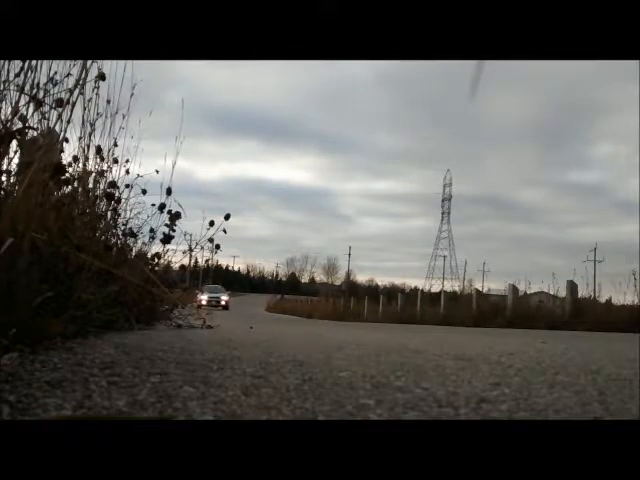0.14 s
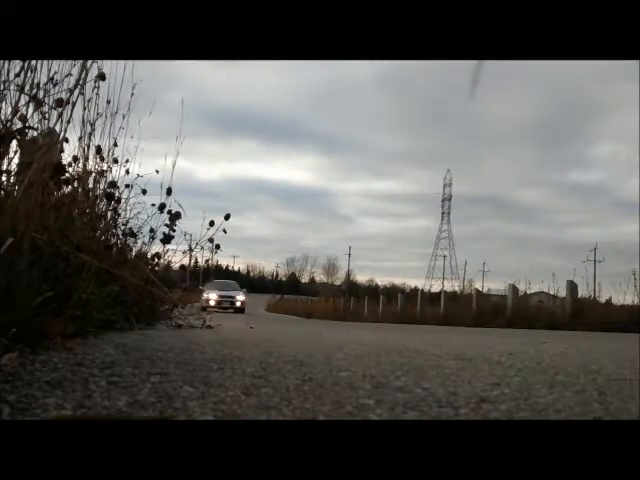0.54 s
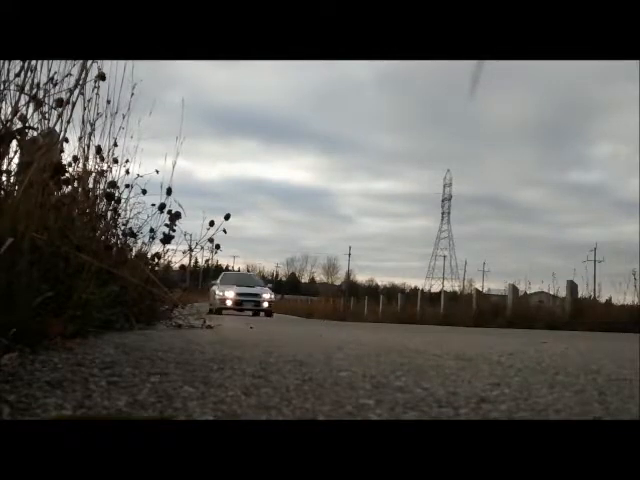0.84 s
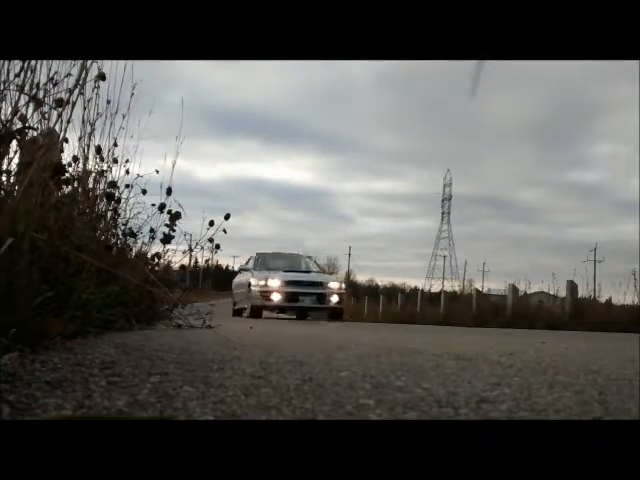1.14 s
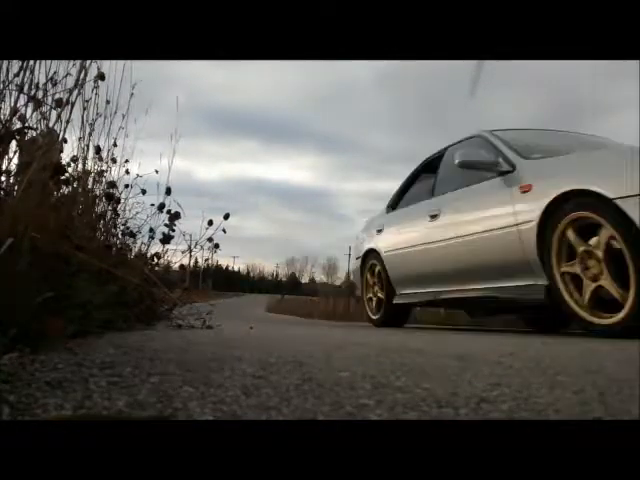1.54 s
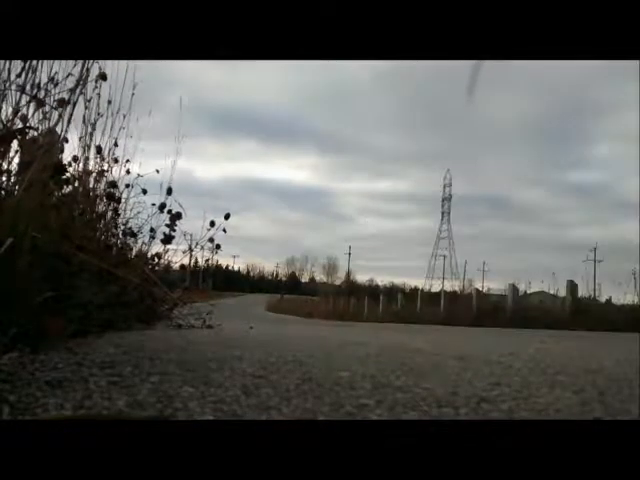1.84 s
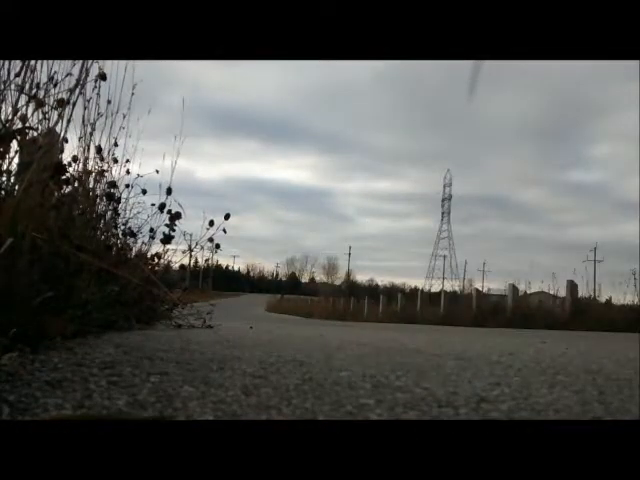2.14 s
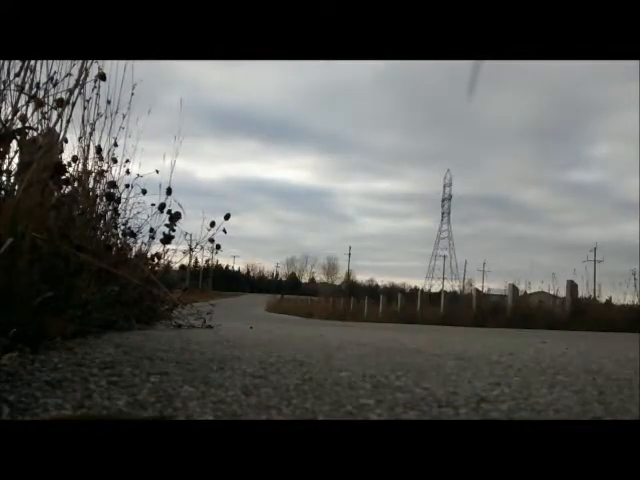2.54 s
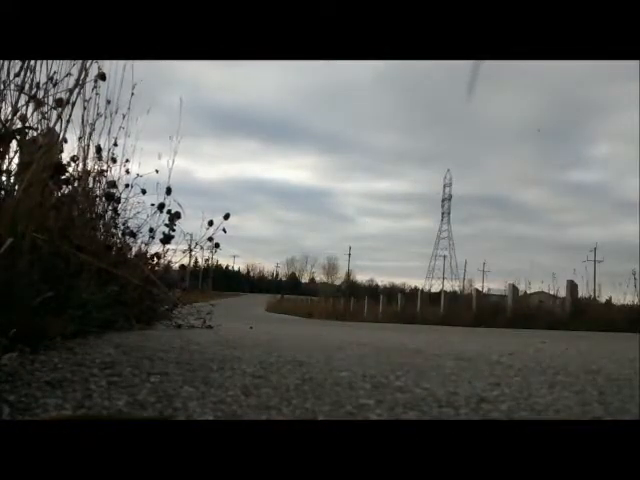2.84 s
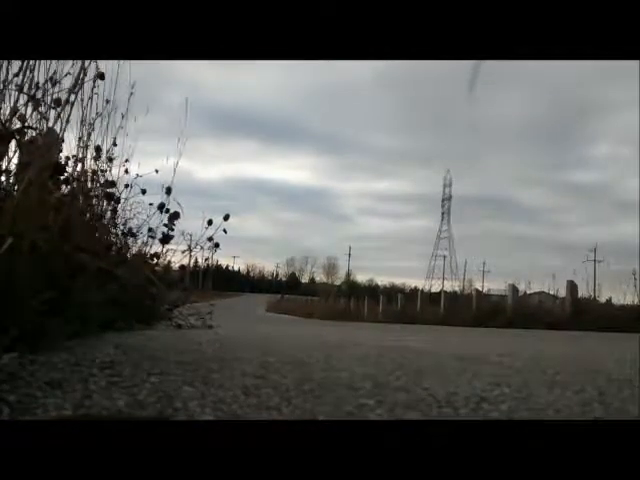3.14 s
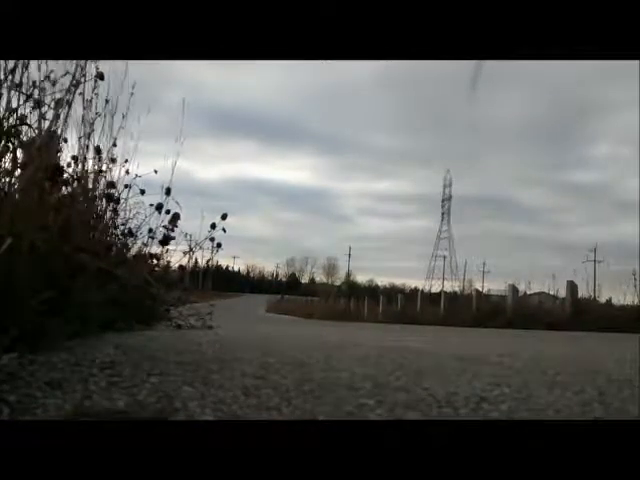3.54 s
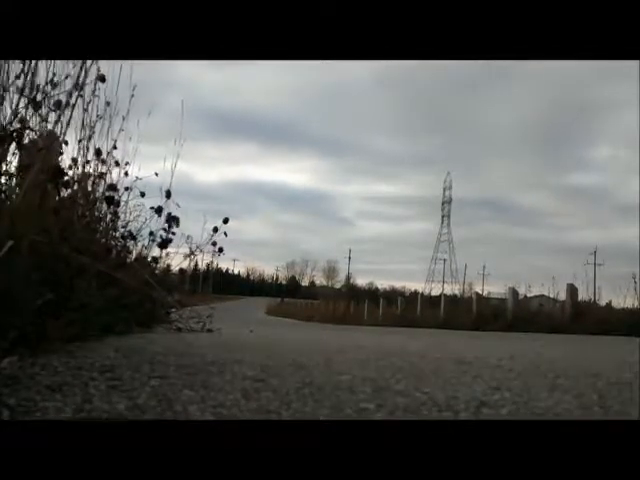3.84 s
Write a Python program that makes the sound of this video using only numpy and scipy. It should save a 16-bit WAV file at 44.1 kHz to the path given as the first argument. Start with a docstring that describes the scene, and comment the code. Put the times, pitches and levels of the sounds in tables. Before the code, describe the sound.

A car with a throbbing engine approaches, hisses, coasts past close by and winds down.

```python
"""Turbo car coasting past

A throbbing four-cylinder pulls towards us at road level, lifts off with a hiss of released boost and
coasts by on whining tyres. Its tailpipe then faces us as the engine runs down to a lumpy idle. The two
microphones have opposite polarity and clip at the pass; the level drops with a click as the car leaves."""
import sys
import numpy as np
from scipy import signal
from scipy.fft import rfft, irfft, next_fast_len
from scipy.io import wavfile
from scipy.ndimage import map_coordinates

SR = 44100
rng = np.random.default_rng(int(sys.argv[2]) if len(sys.argv) > 2 else 0)


def unload_audio(sound):
    """Save the sound as a 16-bit wav file, at the path given as the first command line argument."""
    columns = np.transpose(np.atleast_2d(sound))
    # keep every value between -1 and 1, then stretch to whole-number steps
    steps = np.round(np.clip(columns, -1, 1) * 32767)
    wavfile.write(sys.argv[1], SR, steps.astype(np.int16))


N = 176400
OPPOSED = np.array([[1], [-1]])  # left as it is, right inverted


def amp(db):
    """Decibels to gain."""
    return 10 ** (np.asarray(db) / 20)


def unit(x):
    """Scaled to rms 1."""
    return x / np.sqrt(np.mean(x ** 2) + 1e-20)


def clock():
    """The time of each sample."""
    return np.arange(N) / SR


def curve(rows):
    """(time_s, value) points joined by straight lines."""
    return np.interp(clock(), *np.transpose(rows))


def along(rows, hz):
    """Each column after the frequency, read on a log axis."""
    freqs, *columns = np.transpose(rows)
    return [np.interp(np.log(hz + 1), np.log(freqs + 1), column) for column in columns]


def wobble(rate_hz):
    """A smooth random drift."""
    return map_coordinates(rng.standard_normal(512), [clock() * rate_hz], mode="wrap")


def filtered(x, response):
    """x shaped by a complex frequency response."""
    size = next_fast_len(N + SR // 2)
    return irfft(rfft(x, size) * response(np.fft.rfftfreq(size, 1 / SR)), size)[..., :N]


def ring(spectrum, size=8192):
    """The minimum-phase impulse response with this spectrum, peak 1."""
    gain = amp(along(spectrum, np.fft.rfftfreq(size, 1 / SR))[0])
    cepstrum = irfft(np.log(gain))
    cepstrum[1:size // 2] *= 2
    cepstrum[size // 2 + 1:] = 0
    impulse = irfft(np.exp(rfft(cepstrum)))
    return impulse / np.abs(impulse).max()


def strike(times, sizes, spectrum):
    """Pulses that each ring with the spectrum."""
    pulses = np.bincount(np.round(np.asarray(times) * SR).astype(int), sizes, N)[:N]
    return signal.fftconvolve(pulses, ring(spectrum))[:N]


def rush(rows):
    """Stereo noise from rows of freq_hz, density_db, left-right correlation, pan_db (left over right)."""
    def colour(hz):
        db, correlation, _ = along(rows, hz)
        angle = np.arccos(np.clip(correlation, -1, 1)) / 2
        return np.sqrt(SR / 2) * amp(db) * np.array([np.cos(angle), np.sin(angle)])
    mid, side = filtered(rng.standard_normal((2, N)), colour)
    return filtered(np.array([mid + side, mid - side]), lambda hz: amp(OPPOSED * along(rows, hz)[2] / 2))


def swell(start_s, attack_s, hold_s, fall_db_per_s):
    """Rise, hold and an even fall in dB."""
    t = clock() - start_s
    return np.clip(t / attack_s, 0, 1) * amp(-fall_db_per_s * np.maximum(t - attack_s - hold_s, 0))


def noise_band(rows, width_hz):
    """Narrow noise gliding along rows of time_s, pitch_hz, level_db."""
    times, hz, db = np.transpose(rows)
    phase = 2 * np.pi * np.cumsum(np.interp(clock(), times, hz)) / SR
    a, b = filtered(rng.standard_normal((2, N)), lambda f: 1 / (1 + (f / width_hz) ** 4))
    return unit(a * np.cos(phase) + b * np.sin(phase)) * amp(np.interp(clock(), times, db))


def wavering(rows, width_hz):
    """An unsteady tone gliding along rows of time_s, pitch_hz, level_db."""
    times, hz, db = np.transpose(rows)
    pitch_hz = np.interp(clock(), times, hz) + width_hz * wobble(70)
    tone = np.sin(2 * np.pi * np.cumsum(pitch_hz) / SR) * amp(2.5 * wobble(35))
    return unit(tone) * amp(np.interp(clock(), times, db))


def placed(x, lag_s, pan_db):
    """One source at two microphones, later and louder on the left."""
    return filtered(x, lambda hz: amp(OPPOSED * pan_db / 2) * np.exp(-1j * np.pi * OPPOSED * hz * lag_s))


# Engine harmonics on and off the throttle: cycle_multiple, level_db
PULL_ORDERS = [(1, -38), (2, -30.5), (3, -23.5), (4, -13), (5, -18.5), (6, -30.5), (8, -25), (9, -26),
               (10, -39), (11, -39), (12, -35), (13, -31), (16, -38), (17, -39), (19, -45), (23, -46)]
COAST_ORDERS = [(3, -11), (4, -17.5), (5, -27.5), (7, -30.5), (9, -36.5), (16, -39), (17, -39)]
# Their faders: time_s, gain_db
PULL_FADER = [(0, -.5), (.45, -1), (.8, .5), (.87, -1), (.91, -25), (1, -70)]
COAST_FADER = [(.8, -76), (.87, -24), (0.919, 0), (1.05, -0.5), (1.3, 3.5), (1.55, 0.5), (1.7, -13),
               (1.85, -24), (2.1, -70)]
def engine_front(cycles):
    """Wavering harmonics line up into one throb a cycle, first pulling, then coasting."""
    out = np.zeros(N)
    for orders, fader in (PULL_ORDERS, PULL_FADER), (COAST_ORDERS, COAST_FADER):
        tones = sum(amp(db + .7 * wobble(14.12)) * np.sin(2 * np.pi * k * cycles) for k, db in orders)
        out += np.sqrt(2) * tones * amp(curve(fader))
    return out


# The limping beat of unequal headers: cycle_fraction, accent_db
FIRINGS = [(0, .5), (.237, 0), (.5, -.5), (.763, 0)]
# Exhaust pipe resonance: freq_hz, gain_db
PIPE_EQ = [(15, -42.5), (45, -8.5), (66, 3), (80, 0.5), (105, -1), (140, -13), (180, -20), (240, -25.5),
           (330, -23), (410, -25), (520, -43), (800, -52), (2000, -90), (6000, -110)]
# Fader on the run of firings: time_s, level_db
PIPE_FADER = [(1.1, -56), (1.55, -26), (1.72, -12.5), (1.9, -7), (2.03, -6.5), (2.2, -14.5), (2.36, -18),
              (2.55, -17.5), (2.75, -23), (3.25, -26), (3.5, -31), (3.58, -66)]
# Lone thumps at lift-off and idle: start_s, peak_db
THUMPS = [(0.886, -15), (.94, -13), (3.698, -25), (3.769, -15.5), (3.835, -16), (3.895, -13), (3.949, -9.5)]
def tailpipe(cycles, speed, scatter_db=.6):
    """Four unevenly spaced firings a cycle, and a few lone thumps, ring the pipe."""
    fraction, accent_db = np.transpose(FIRINGS)
    due = (np.arange(int(cycles[-1]))[:, None] + fraction).ravel()
    sizes = amp(np.resize(accent_db, len(due)) + scatter_db * rng.standard_normal(1024)[:len(due)])
    firings = strike(np.interp(due, cycles, clock()), sizes, PIPE_EQ)
    burble = unit(firings / np.sqrt(speed)) * amp(curve(PIPE_FADER))
    thump_s, thump_db = np.transpose(THUMPS)
    return burble + strike(thump_s, amp(thump_db), PIPE_EQ)


# Drone of the pass: time_s, pitch_hz, level_db
DRONE = [(1.2, 460, -53), (1.42, 458, -24.5), (1.52, 456, -23), (1.6, 454, -33), (1.72, 450, -19),
         (1.82, 440, -40), (2.3, 405, -75)]
def passing_drone():
    """A hollow tone sinks as the car goes by."""
    return wavering(DRONE, width_hz=12)


# Roar colour from four sides: freq_hz, density_db, correlation, pan_db
FAR = [(25, -62, 0.92, -6.5), (90, -47, 0.97, 1.5), (242, -54.5, 0.96, 0.5), (386, -54, 1, 1),
       (450, -48.5, 0.99, 0), (514, -55.5, 0.99, 1), (589, -51.5, 0.99, 1), (798, -60.5, 1, -4.5),
       (1064, -63, -0.25, -8), (1400, -65.5, 0.56, 7.5), (2420, -63.5, 1, -3.5), (3556, -64.5, -0.71, -8),
       (4350, -78.5, -0.68, 1), (8000, -96.5, -0.67, -1), (15100, -103, 0.41, 0)]
NEAR = [(25, -58.5, 0.99, 5), (90, -48.5, 0.93, 2.5), (255, -54, 1, -0.5), (430, -52.5, 0.99, 0),
        (540, -62.5, 0.96, 2.5), (1100, -59, 0.59, -5), (1230, -64.5, 0.33, 2), (2130, -55.5, 0.95, 0),
        (3460, -63.5, 0.87, -6), (4210, -74.5, 0.44, -8.5), (6600, -87.5, 0.24, 6.5),
        (8800, -93.5, 0.5, -5), (15000, -104, -0.12, 0)]
BESIDE = [(25, -57, 0.89, -1), (88.5, -36, 0.98, -1), (230, -46, 0.99, 0.5), (443, -45, 0.93, 3.5),
          (540, -52, 0.96, 4), (880, -57, 0.15, 8.5), (1120, -52.5, -1.2, 3), (1510, -55, -2.7, -5.5),
          (2330, -56, 0.98, -7.5), (3700, -62, -0.67, 5), (4100, -67, -0.14, -6), (6300, -81, -0.024, 1),
          (9000, -85.5, -0.13, -1), (14910, -101, 0.052, -1)]
BEHIND = [(24.5, -62, 0.7, 10), (93, -39.5, 1, -0.5), (220, -55, 0.97, -1), (356, -53.5, 0.97, 5.5),
          (534, -61, 0.63, 5), (760, -68, -0.55, 9.5), (1010, -63, -1.04, 0), (1670, -65.5, -0.91, -4),
          (2080, -70.5, 0.36, -3), (2540, -73, 1, -7), (3420, -77, -0.66, -10), (4720, -88, 0.83, -8),
          (6400, -91, -0.11, 0.5), (8340, -99, 0.54, -2), (14990, -109, -0.14, 1)]
# Crossfades between them: time_s, gain_db
FAR_FADER = [(0, -2.5), (.45, -1), (.8, 2), (.9, 0), (1.15, -3.5), (1.499, -16), (1.7, -72)]
NEAR_FADER = [(0, -30), (0.701, -5.5), (.9, -2), (1.25, 0.5), (1.55, 2), (1.7, 1), (1.9, -40), (2.1, -68)]
BESIDE_FADER = [(1.102, -54), (1.5, -14), (1.64, -3), (1.75, 1.5), (1.82, -6.5), (1.92, -23.5), (2.4, -67)]
BEHIND_FADER = [(1.6, -58), (1.8, 7.5), (2, 1.5), (2.2, -4.5), (2.36, -5), (2.55, -7.5), (3, -9), (3.6, -9),
                (4, -9.5)]
def roar(cycles, throb=.11, throb_below_hz=550):
    """Tyres and exhaust gas change colour through the pass; the low end throbs with the engine."""
    sides = [(FAR, FAR_FADER), (NEAR, NEAR_FADER), (BESIDE, BESIDE_FADER), (BEHIND, BEHIND_FADER)]
    noise = sum(rush(colour) * amp(curve(fader)) for colour, fader in sides) * amp(.71 * wobble(16))
    lows = filtered(noise, lambda hz: 1 / (1 + (hz / throb_below_hz) ** 2))
    return noise + throb * np.cos(2 * np.pi * cycles) * lows


# Gas leaving the pipe: freq_hz, density_db, correlation, pan_db
RASP = [(200, -80, 1, 0), (385, -49.5, .6, 4), (640, -61, .6, 3), (2300, -78, 0, -3),
        (3500, -66.5, -.3, -4), (8000, -96, 0, 0)]
def exhaust_rasp(cycles):
    """The pipe growls in puffs, one a cycle, while it points straight at us."""
    puffs = 1 + .35 * np.cos(2 * np.pi * cycles)
    return rush(RASP) * puffs * swell(start_s=1.87, attack_s=.1, hold_s=.12, fall_db_per_s=95)


# The tread's airy band and its singing core: time_s, pitch_hz, level_db
TREAD_BAND = [(0, 1240, -49.5), (.75, 1216, -41), (1.051, 1050, -45), (1.619, 1084, -46),
              (1.74, 878.5, -30.5), (1.879, 873, -33), (2.3, 853, -53), (2.5, 860, -80)]
TREAD_CORE = [(0, 1215, -46), (.73, 1255, -42), (.88, 1110, -50), (1.06, 1052, -36.5), (1.25, 1060, -42.5),
              (1.5, 1072, -41), (1.61, 1165, -35), (1.78, 995, -29), (1.95, 880, -50), (2.1, 880, -80)]
def tyre_whine():
    """Tread whine sinks as the car slows and passes, reaching the microphones out of step."""
    return (noise_band(TREAD_BAND, width_hz=86) + wavering(TREAD_CORE, width_hz=16)) * OPPOSED


# The valve's attack and tail: freq_hz, density_db, correlation, pan_db
SPIT = [(1700, -97, 0, -4), (2640, -75, 0.57, -3), (3200, -57.5, -0.4, -13), (3750, -57, -0.44, 1),
        (5700, -105, 0, -2)]
HISS = [(1200, -92, 0.19, -9), (2500, -75, 0.89, -1), (3150, -62.5, -0.62, -12), (3980, -63.5, 0, 6),
        (4440, -67.5, 0.77, 0), (6000, -77, 0, -3), (6800, -73.5, -0.54, -1), (7560, -83.5, -0.32, 5),
        (8600, -83.5, -1, -1), (11700, -85.5, -0.27, -5.5), (15000, -103, 0.19, -5)]
# Its faint whistle: time_s, pitch_hz, level_db
WHISTLE = [(.82, 5250, -85), (.89, 5300, -48), (1, 5350, -54), (1.17, 5400, -47), (1.36, 5250, -56),
           (1.7, 5200, -90)]
def boost_release(flutter_db=.6):
    """The valve spits open as the throttle closes, then vents with a fluttering hiss and whistle."""
    spit = rush(SPIT) * swell(start_s=.85, attack_s=.024, hold_s=.013, fall_db_per_s=222)
    hiss = rush(HISS) * swell(start_s=.825, attack_s=.13, hold_s=.17, fall_db_per_s=42)
    whistle = noise_band(WHISTLE, width_hz=190) * OPPOSED
    return spit + (hiss + whistle) * amp(flutter_db * wobble(30.3))


# Grit hits: start_s, level_db, pitch_hz
TICKS = [(3.063, -20.5, 1400), (3.067, -24, 1300), (3.309, -30, 3400), (3.529, -19.5, 1310),
         (3.804, -31, 4000)]
def grit(t60_s=.007, crack=.14):
    """Small stones tick on the road, each a tiny ping with a noisy crack."""
    out = np.zeros((2, N + SR))
    t = np.arange(SR // 20) / SR
    for start_s, db, hz in TICKS:
        tick = np.sin(2 * np.pi * hz * t) * OPPOSED + crack * rng.standard_normal((2, len(t)))
        start = round(start_s * SR)
        out[:, start:start + len(t)] += tick * amp(db - 60 * t / t60_s)
    return out[:, :N]


# Bass-heavy rustle: freq_hz, density_db, correlation, pan_db
RUSTLE = [(25, -42.5, 0.85, 3), (90, -38, 0.99, 3.5), (252, -55, 1, 2), (1500, -80, 0, -3),
          (4340, -75, 0, -7.5), (8100, -80, 0.27, -3), (15200, -100, 0, -30)]
def rustle():
    """Something stirs briefly close by."""
    return rush(RUSTLE) * swell(start_s=3.907, attack_s=.04, hold_s=.01, fall_db_per_s=130)


# Four-stroke revs, climbing then running down: time_s, cycles_per_s
REVS = [(0, 33.9), (.4, 36.1), (.85, 39), (.92, 36), (1, 34.9), (1.25, 31.1), (1.5, 27.4), (1.75, 23.9),
        (2, 19.5), (2.25, 16), (2.5, 13.7), (2.75, 11.1), (3, 9.3), (3.3, 6.3), (3.55, 4.2)]
def scene():
    """One engine speed drives the harmonics, the firings and the pulse of roar and rasp."""
    speed = curve(REVS) * (1 + .0018 * wobble(20))
    cycles = np.cumsum(speed) / SR
    front = placed(engine_front(cycles), lag_s=.00002, pan_db=.79)  # head on, almost centred
    rear = placed(tailpipe(cycles, speed), lag_s=.00017, pan_db=1.43)
    car = front + rear + passing_drone() + roar(cycles) + exhaust_rasp(cycles)
    return car + tyre_whine() + boost_release() + grit() + rustle()


# Bright click: freq_hz, gain_db
CLICK_EQ = [(300, -46), (1000, -15), (3080, -11), (5200, -12), (6400, 14), (7600, -5), (8850, 9.5),
            (10300, -22), (11500, 11), (13500, -0.5), (16000, -10.5)]
# Microphone hiss: freq_hz, density_db, correlation, pan_db
MIC_HISS = [(30, -94, 0.99, 0.0038), (1000, -100, 0.68, 0), (5960, -108, 0, 0.0048), (15000, -110, 0, 0)]
def record(dry):
    """The level drops with a click; the right channel is inverted, peaks clip and the top is cut."""
    drop_s, drop_db = 2.3714, -12.5
    left_lag_s, clip_hardness, top_hz = .0004, 9, 16000
    click = np.array([strike([s], [amp(1.5)], CLICK_EQ) for s in (drop_s + left_lag_s, drop_s)])
    ducked = dry * amp(drop_db * (clock() > drop_s))
    mics = (ducked + rush(MIC_HISS)) * OPPOSED
    clipped = mics / (1 + np.abs(mics) ** clip_hardness) ** (1 / clip_hardness)
    return filtered(clipped + click, lambda hz: np.clip((top_hz - hz) / 800 + .5, 0, 1))


dry = scene()
out = record(dry)
unload_audio(out)
```